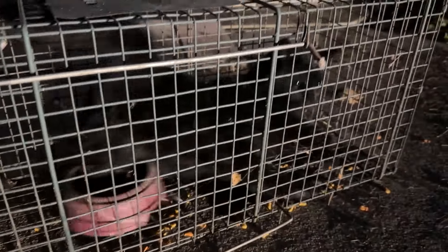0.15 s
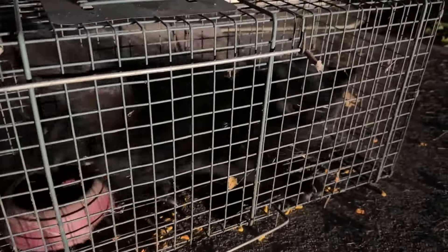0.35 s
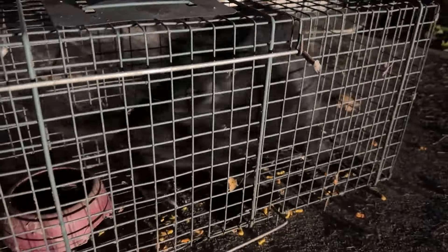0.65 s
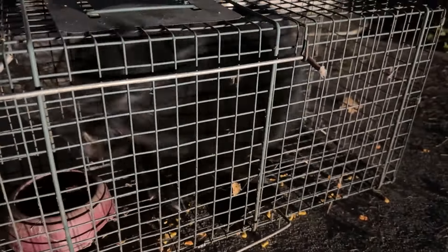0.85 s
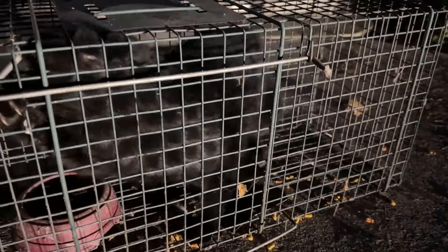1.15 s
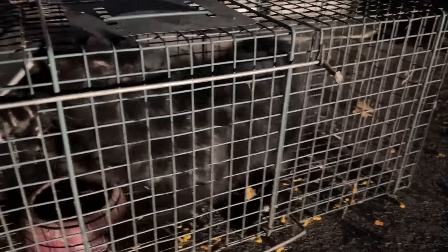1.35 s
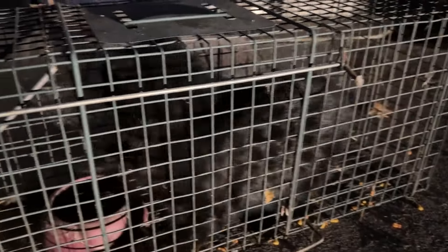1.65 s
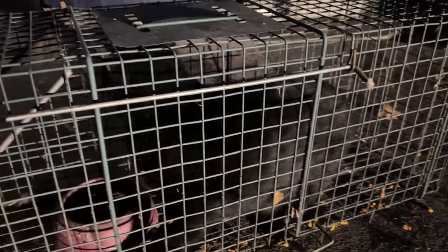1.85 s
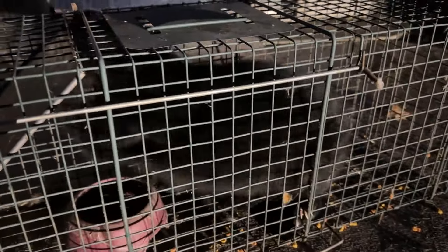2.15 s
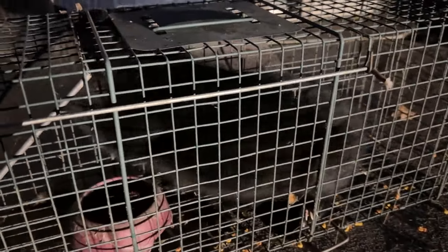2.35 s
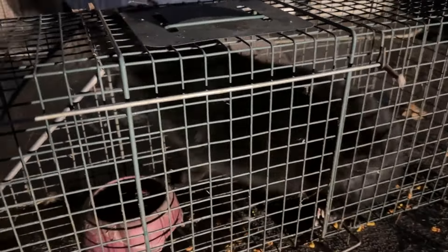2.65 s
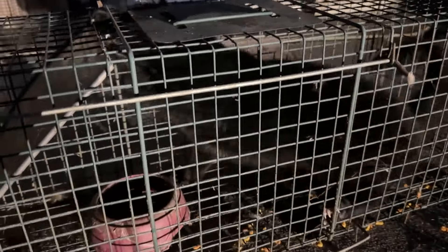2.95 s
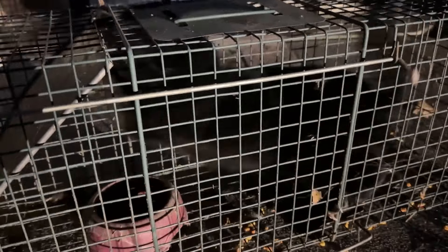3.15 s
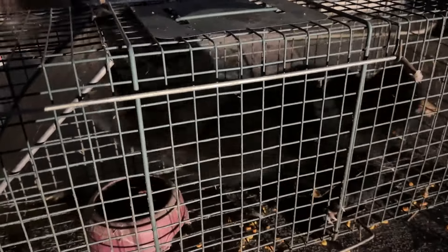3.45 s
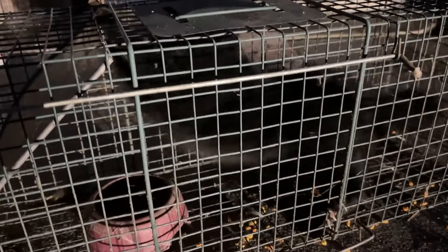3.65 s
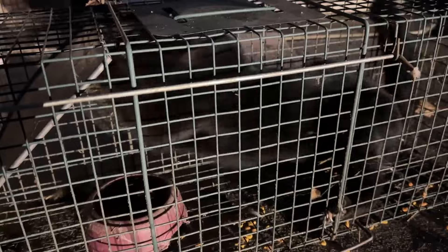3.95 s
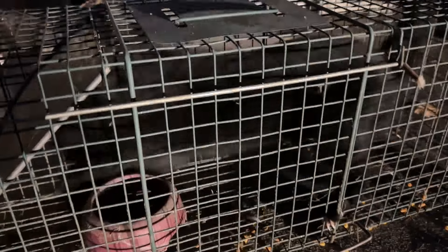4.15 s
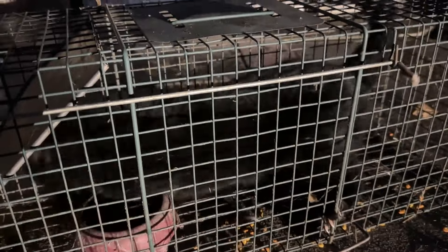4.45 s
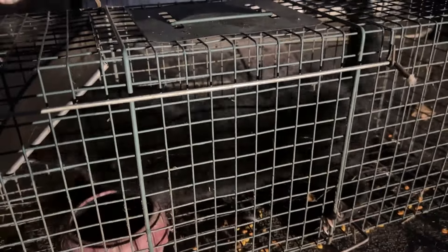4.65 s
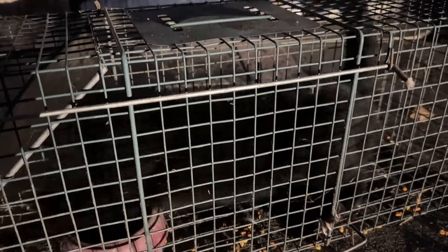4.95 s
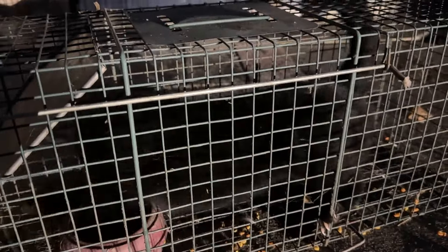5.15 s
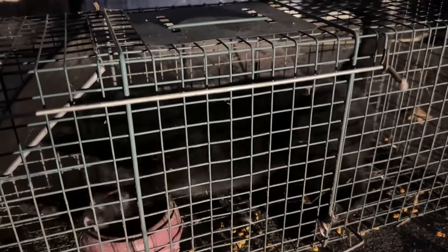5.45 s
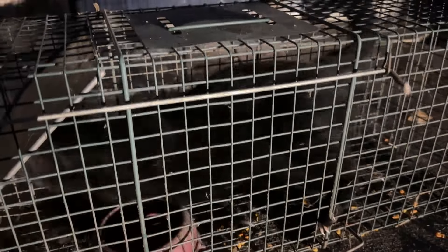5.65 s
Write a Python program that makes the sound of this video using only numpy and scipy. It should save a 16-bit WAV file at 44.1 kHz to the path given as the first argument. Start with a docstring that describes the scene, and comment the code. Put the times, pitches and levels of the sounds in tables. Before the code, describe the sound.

A dark-furred cat shoves and scrambles inside a wire-mesh trap, rattling and knocking the metal in bursts over low wind rumble outdoors.

```python
"""A cat shifts about inside a wire-mesh trap: shoves, drags and knocks on the mesh and frame.
Each shove or drag opens a decaying burst of dense wire ticks; fur and paws keep the mesh rustling.
The ticks drive resonant wires and frame; knocks add decaying sines and dry cracks.
Low wind noise and decaying sine puffs rumble on two microphone ports, over a faint outdoor hush of noise."""
import sys
import numpy as np
from scipy import signal
from scipy.fft import rfft, irfft, next_fast_len
from scipy.io import wavfile

SR = 44100
rng = np.random.default_rng(int(sys.argv[2]) if len(sys.argv) > 2 else 0)


def bounce(signal):
    """Save signal as a 16-bit WAV file at the path given by the first command-line argument."""
    frames = np.transpose(np.atleast_2d(signal))
    limited = np.clip(frames, -1, 1)
    pcm = np.round(limited * 32767).astype(np.int16)
    wavfile.write(sys.argv[1], SR, pcm)


N = 255294

# shoves against the mesh: (time [s], mid-band level [dB], brightness [dB], chatter T60 [s])
SHOVES = [(0.155, -35, -23, 0.24), (0.2285, -29.5, -13, 0.061), (0.2672, -29, 7, 0.11),
          (0.4376, -36.5, -17, 0.035), (0.511, -26, 9.5, 0.2), (0.576, -31, 10, 0.11),
          (0.612, -31.5, 8, 0.15), (0.647, -39, 1.5, 0.08), (0.7076, -28.5, 15, 0.24),
          (0.9067, -34, 2.5, 0.21), (0.969, -35, 31, 0.28), (1.0084, -36, 3.5, 0.42),
          (1.105, -47, 25, 0.18), (1.1293, -35.5, 11, 0.073), (1.1754, -35, 8.5, 0.087),
          (1.217, -37.5, 12, 0.16), (1.3175, -35, 5.5, 0.41), (1.354, -33.5, 5.5, 0.25),
          (1.445, -45.5, 14, 0.15), (1.777, -51.5, -42, 0.27), (2.132, -44, 24, 0.17),
          (2.15, -40, -3, 0.29), (2.279, -48, 13, 0.34), (2.429, -41.5, -8, 0.55), (2.496, -37.5, 3, 0.61),
          (2.523, -37.5, -5, 0.18), (2.572, -38.5, 0, 0.2), (2.623, -39.5, 0, 0.23),
          (2.7179, -39, 12, 0.12), (2.781, -43, 6, 0.31), (2.967, -42, 4, 0.076),
          (2.9862, -27.5, 5.5, 0.23), (3.0195, -34.5, 2.5, 0.39), (3.055, -39, 0, 0.94),
          (3.088, -39, -12, 0.16), (3.112, -28.5, 3, 0.31), (3.161, -32, 1, 0.22), (3.1995, -31, 14, 0.11),
          (3.3347, -35, 1.5, 0.12), (3.472, -38, -4.5, 0.2), (3.582, -52.5, 38, 0.34),
          (3.686, -34, -8, 0.45), (3.725, -32.5, 18, 0.085), (3.7894, -45, -1, 0.32),
          (3.923, -44.5, 15, 0.12), (3.9604, -36, 3, 0.29), (4.0436, -40, 2, 0.16),
          (4.1076, -39.5, -32, 0.33), (4.142, -33, 3, 0.18), (4.203, -40.5, 34, 0.31),
          (4.2468, -33.5, 2, 0.28), (4.5994, -37.5, -14, 0.26), (4.7524, -45.5, -54, 0.29),
          (4.835, -40, -22, 0.22), (4.9194, -28.5, -2.5, 0.11), (4.935, -30.5, -26, 0.29),
          (4.991, -39.5, -39, 0.3), (5.0655, -38, -13, 0.16), (5.105, -39.5, 12, 0.29),
          (5.1777, -39, -10, 0.22), (5.215, -39, -11, 0.21), (5.244, -40, -33, 0.14),
          (5.273, -29.5, -11, 0.19), (5.342, -39, 34, 0.18), (5.419, -39.5, 27, 0.12),
          (5.4492, -37.5, -26, 0.067), (5.518, -40, -63, 0.23), (5.5593, -25.5, -7, 0.22),
          (5.624, -31, -6, 0.32), (5.725, -33.5, -6, 0.17)]
# drags along the mesh, which swell in: (time [s], mid-band level [dB], brightness [dB], chatter T60 [s])
DRAGS = [(0.196, -35, -16, 0.17), (0.719, -21.5, 5, 0.23), (0.792, -24, 9.5, 0.21), (2.807, -30.5, 6, 0.21),
         (3.31, -29.5, 3, 0.21), (3.653, -27, 2, 0.34), (4.273, -28, -25, 0.16), (4.874, -34.5, 47, 0.29)]
# single knocks on frame and wires: (time [s], level before the rise [dB], pitch [Hz])
KNOCKS = [(0.142, -17, 1390), (0.158, -2.5, 1475), (0.5125, -9.5, 3400), (0.6141, -11, 3050),
          (0.7213, -5, 3600), (2.435, -13.5, 1410), (2.576, -13, 1440), (2.586, -17, 1350),
          (2.625, -21, 1350), (2.986, -12.5, 2170), (2.995, -13, 3650), (3.115, -18, 2350),
          (3.47, -19, 574), (4.28, -18, 950), (4.6015, -13, 4300), (4.837, -6, 1500), (4.921, -21, 950),
          (4.9215, -11, 4270), (4.938, -13, 4240), (4.937, -13, 1010), (4.991, -16, 870),
          (5.177, -21.5, 880), (5.243, -16.5, 914), (5.273, -12, 2250), (5.274, -12, 3680),
          (5.562, -3.5, 870)]
# rustle of the mesh between shoves: (time [s], mid-band level [dB], treble re mid [dB])
RUSTLE = [(0, -39.5, -10.5), (.1, -55, -10), (.22, -35.5, -3), (.48, -54.5, -12), (.9, -46.5, -8),
          (1.3, -60, 3), (1.6, -66.5, -4), (2.4, -57, -8), (3.1, -54.5, -21), (3.55, -58, -7.5),
          (3.9, -58.5, -3), (4.2, -42.5, -9), (4.45, -58, -7.5), (4.8, -58, -6), (5.1, -57.5, 5),
          (5.79, -43.5, -9.5)]
# spectral density of the mesh ticks: (frequency [Hz], relative density [dB per Hz])
MESH_SPECTRUM = [(150, -2), (300, -2.5), (800, -2.5), (1600, -0.5), (2100, -7), (4500, -8), (6500, -10.5),
                 (8000, -7), (11000, -8), (13000, -11), (15500, -10.5)]
# ringing wires: (frequency [Hz], width [Hz], gain [dB])
WIRES = [(4020, 31, -2.5), (9500, 32, -13), (10850, 62, -0.5), (14600, 68, 9.5)]
# frame resonances: (frequency [Hz], width [Hz], gain [dB])
FRAME = [(459.6, 7, 3.5), (897, 390, -7), (1450, 130, -9.5)]
# wind noise: (time [s], level [dB])
WIND_LEVEL = [(0, -26), (.1, -32), (.27, -30), (.55, -42.5), (1.5, -40.5), (1.8, -32), (2.11, -34),
              (2.19, -48.5), (2.32, -35), (3.3, -34.5), (4.2, -30), (4.5, -32.5), (4.7, -39), (5.79, -38)]
# spectral density of the wind: (frequency [Hz], relative density [dB per Hz])
WIND_SPECTRUM = [(15, -53), (30, -56), (47, -5), (77, 1), (130, -9), (250, -23), (500, -46), (1000, -104)]
# wind puffs that thump the ports: (time [s], envelope peak before the high-pass [dB], pitch [Hz])
PUFFS = [(0.025, -12, 70.4), (0.056, -16.5, 93), (0.196, -21.5, 66), (0.232, -18.5, 98), (0.3, -23.5, 112),
         (2.098, -29.5, 161), (2.578, -25, 98), (2.682, -25, 156), (3.213, -22, 121), (3.791, -22, 79),
         (4.172, -18.5, 144), (4.276, -17, 90)]
# spectral density of the outdoor hush: (frequency [Hz], relative density [dB per Hz])
HUSH_SPECTRUM = [(150, 4), (300, -0.5), (1100, -6), (1600, -22), (2500, -31.5), (8000, -27), (11000, -29),
                 (15500, -62)]
# pair of ports: (frequency [Hz], phase lead of the left [rad], base left-right likeness [0..1])
PORTS = [(0, 0, .75), (400, 0, .9), (1100, .6, .85), (1700, 2.1, .6), (2000, -.1, .75), (3100, .9, .65),
         (4300, .2, .35), (5000, 1.2, .6), (5700, -.1, .55), (7000, 1.1, .6), (8000, 2.8, .8),
         (10900, .2, .97), (13000, -.1, .97), (13600, -.7, .8), (15800, -2.4, .85)]

# brightness > 0 is a claw: less body, some more treble; < 0 a padded paw: less treble, some more body
CLAW_TREBLE_DB_PER_DB, PAW_BODY_DB_PER_DB = 0.27, 0.18
SHOVE_RISE_PER_T60, DRAG_RISE_S = 0.011, 0.008
FIRST_TICK_GAIN, FIRST_TICK_S = 0.29, 0.0021
KNOCK_T60_CYCLES, KNOCK_RISE_CYCLES = 25.5, 4.2
CRACK_RE_KNOCK_DB, CRACK_T60_S = -27, 0.0072
RUSTLE_BODY_RE_MID_DB = 3.5
BODY_HZ, TREBLE_HZ = 1480, 7180
STRAY_WIRES, STRAY_WIDTH_HZ, STRAY_DB, STRAY_SWING_DB = 30, 20, -6, 7
PUFF_PEAK_S = 0.0064
HUSH_DB = -50
CUTOFF_HZ = 15800


def trap():
    """Sums the mesh rattle, the wires and frame it sets ringing, and the knocks."""
    rattle = mesh_rattle()
    knocks_both_ports = knocks() * [[1], [0]]   # common signal only
    return rattle + wire_ring(rattle) + frame_ring(rattle) + knocks_both_ports


def mesh_rattle():
    """Wire ticks in three bands, each scaled by the root of its summed power."""
    power = rustle_power()
    add_bursts(power)
    add_cracks(power)
    bands = split(chatter(ticks_per_s=11000, spread_db=0.5, clumps_db=1.5, patchy_db=2.5))
    return sum(np.sqrt(p) * band for p, band in zip(power, bands))


def rustle_power():
    """Continuous friction of fur and paws: power of body, middle and treble."""
    mid_db, treble_re_mid_db = in_time(RUSTLE)
    return from_db([mid_db + RUSTLE_BODY_RE_MID_DB, mid_db, mid_db + treble_re_mid_db]) ** 2


def add_bursts(power):
    """Each shove or drag sets wires chattering, decaying exponentially; adds the power per band."""
    t = np.arange(SR // 2) / SR
    # the opening burst stands out of the chatter
    first_contact = 1 + FIRST_TICK_GAIN * np.exp(-t / FIRST_TICK_S)
    bursts = [(*row, first_contact * np.minimum(t / (SHOVE_RISE_PER_T60 * row[3]), 1)) for row in SHOVES]
    bursts += [(*row, np.minimum(t / DRAG_RISE_S, 1)) for row in DRAGS]
    for start_s, level_db, bright_db, t60_s, rise in bursts:
        at = round(start_s * SR)
        n = min(len(t), N - at)
        claw_db, paw_db = max(bright_db, 0), max(-bright_db, 0)
        body_db = PAW_BODY_DB_PER_DB * paw_db - claw_db
        treble_db = CLAW_TREBLE_DB_PER_DB * claw_db - paw_db
        band_db = level_db + np.array([[body_db], [0], [treble_db]])
        envelope = from_db(-60 * t / max(t60_s, .01)) * rise
        power[:, at:at + n] += (from_db(band_db) * envelope[:n]) ** 2


def add_cracks(power):
    """A dry crack at each knock: a brief burst of middle and treble ticks."""
    t = np.arange(SR // 2) / SR
    for start_s, level_db, _ in KNOCKS:
        at = round(start_s * SR)
        crack = from_db(level_db + CRACK_RE_KNOCK_DB - 60 * t / CRACK_T60_S)
        power[1:, at:at + len(t)] += crack[:N - at] ** 2


def knocks():
    """Damped sine per knock, with decay and rise set in cycles of its pitch."""
    out, t = np.zeros(N), np.arange(SR // 2) / SR
    for start_s, level_db, hz in KNOCKS:
        at = round(start_s * SR)
        knock = np.sin(2 * np.pi * hz * t) * from_db(-60 * t * hz / KNOCK_T60_CYCLES)
        knock *= np.minimum(t * hz / KNOCK_RISE_CYCLES, 1)   # each tone rises over a few cycles
        out[at:at + len(t)] += from_db(level_db) * knock[:N - at]
    return out


def chatter(ticks_per_s, spread_db, clumps_db, patchy_db):
    """Dense clumped wire ticks, mesh-coloured; two channels share tick times, with unrelated random gains."""
    sizes = from_db(spread_db * np.minimum(rng.exponential(1, N), 4))
    born = rng.random(N) < ticks_per_s * from_db(clumps_db * drift(corner_hz=45)) / SR
    ticks = coloured(sizes * born * rng.standard_normal((2, N)), MESH_SPECTRUM)
    # other wires take over all the time, so each third of an octave swells and sinks by itself
    size = next_fast_len(N)
    spectrum = rfft(ticks, size)
    hz = np.arange(1, size // 2 + 2) * SR / size
    thirds = np.clip(3 * np.log2(hz / 300), 0, 17)
    out = 0
    for k in range(18):
        share = np.maximum(1 - abs(thirds - k), 0)
        band = irfft(spectrum * share, size)[:, :N]
        out = out + from_db(patchy_db * drift(corner_hz=13.0)) * band
    return out


def wire_ring(rattle):
    """Narrow resonances driven by the rattle: fixed wires plus stray ones at chance pitches."""
    out = 0
    for hz, width_hz, gain_db in WIRES:
        touch = from_db(1.7 * drift(corner_hz=11.0))   # which wires are touched keeps changing
        out = out + from_db(gain_db) * ring(rattle * touch, hz, width_hz)
    stray_hz = np.geomspace(1200, 14500, num=STRAY_WIRES) * rng.uniform(.96, 1.04, STRAY_WIRES)
    for hz in stray_hz:
        touch = from_db(STRAY_DB + STRAY_SWING_DB * drift(corner_hz=7.8))
        out = out + ring(rattle * touch, hz, STRAY_WIDTH_HZ)
    return out


def frame_ring(rattle):
    """Low resonances of the frame driven by the rattle."""
    return sum(from_db(gain_db) * ring(rattle, hz, width_hz) for hz, width_hz, gain_db in FRAME)


def wind():
    """Turbulence at the ports: low noise of drifting level plus puffs, high-passed."""
    level_db, = in_time(WIND_LEVEL)
    noise = coloured(rng.standard_normal((2, N)), WIND_SPECTRUM)
    out = noise * from_db(level_db + 3.2 * drift(corner_hz=10.8))
    t = np.arange(SR // 8) / SR
    envelope = (t / PUFF_PEAK_S) * np.exp(1 - t / PUFF_PEAK_S)
    for start_s, peak_db, hz in PUFFS:
        at = round(start_s * SR)
        out[0, at:at + len(t)] += from_db(peak_db) * np.sin(2 * np.pi * hz * t) * envelope
    # keeps the rumble above the deepest bass
    return signal.sosfilt(signal.butter(2, 36, "high", fs=SR, output="sos"), out)


def hush():
    """Distant outdoor sound as steady coloured noise."""
    return from_db(HUSH_DB) * coloured(rng.standard_normal((2, N)), HUSH_SPECTRUM)


def ports(common_and_own, likeness):
    """Common signal with opposite phase shifts; own signal added left, subtracted right, by likeness."""
    hz, lead_rad, alike = np.transpose(PORTS)
    size = next_fast_len(N)
    grid_hz = np.arange(size // 2 + 1) * SR / size
    alike = np.interp(grid_hz, hz, alike) ** (1 / likeness)
    common, own = rfft(common_and_own, size)
    side = np.array([[1], [-1]])
    both = np.sqrt((1 + alike) / 2) * common + np.sqrt((1 - alike) / 2) * own * side
    shift = np.exp(.5j * np.interp(grid_hz, hz, lead_rad) * side)
    return irfft(both * shift, size)[:, :N]


def split(x):
    """Complementary body, middle and treble filters, each output then scaled to rms 1."""
    size = next_fast_len(N)
    grid_hz = np.arange(size // 2 + 1) * SR / size
    body = 1 / (1 + (grid_hz / BODY_HZ) ** 4)
    treble = 1 / (1 + (TREBLE_HZ / (grid_hz + 1)) ** 6)
    spectrum = rfft(x, size)
    return [rms_one(irfft(spectrum * share, size)[:, :N]) for share in (body, 1 - body - treble, treble)]


def ring(drive, hz, width_hz):
    """Two-pole resonance with about unit gain at its peak."""
    r = np.exp(-np.pi * width_hz / SR)
    zeros = [(1 - r * r) / 2, 0, (r * r - 1) / 2]
    poles = [1, -2 * r * np.cos(2 * np.pi * hz / SR), r * r]
    return signal.lfilter(zeros, poles, drive + 1e-18)


def drift(corner_hz):
    """Slow random curve of rms 1: two-pole low-passed noise at SR/40, interpolated."""
    r = np.exp(-2 * np.pi * corner_hz * 40 / SR)
    noise = rng.standard_normal(N // 40 + 2002)
    slow = signal.lfilter([1], [1, -2 * r, r * r], noise)[2000:]   # drop the filter's start-up
    return np.interp(np.arange(N) / 40, np.arange(len(slow)), rms_one(slow))


def coloured(x, spectrum):
    """Filters x by (Hz, dB) points on a log-frequency axis; rms 1."""
    hz, db = np.transpose(spectrum)
    size = next_fast_len(N)
    grid_hz = np.maximum(np.arange(size // 2 + 1) * SR / size, 1)
    gain = from_db(np.interp(np.log(grid_hz), np.log(hz), db))
    return rms_one(irfft(rfft(x, size) * gain, size)[..., :N])


def in_time(rows):
    """Columns of a curve table interpolated to every sample."""
    time_s, *columns = np.transpose(rows)
    return [np.interp(np.arange(N) / SR, time_s, c) for c in columns]


def rms_one(x):
    """Scales to rms 1."""
    return x / np.sqrt(np.mean(x ** 2) + 1e-20)


def from_db(db):
    """Decibels to amplitude gain."""
    return 10 ** (np.asarray(db) / 20)


def scene():
    """Trap, wind and hush at the two ports; the trap slightly louder on the left."""
    near = ports(trap(), likeness=0.99) * from_db([[.5], [-.5]])
    return near + ports(wind(), likeness=0.91) + ports(hush(), likeness=0.043)


def record(dry):
    """Steep elliptic low-pass cuts the top."""
    return signal.sosfilt(signal.ellip(10, .5, 70, CUTOFF_HZ, fs=SR, output="sos"), dry)


dry = scene()
out = record(dry)
bounce(out)
```